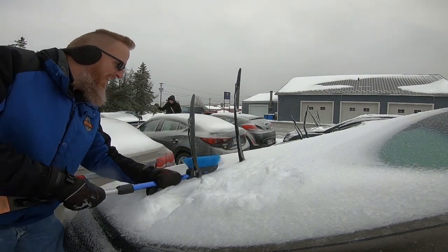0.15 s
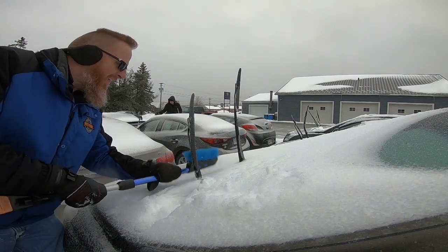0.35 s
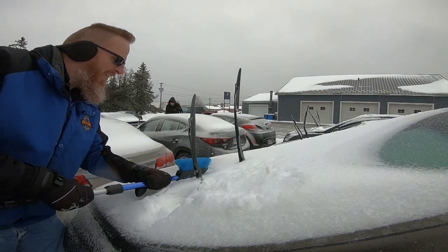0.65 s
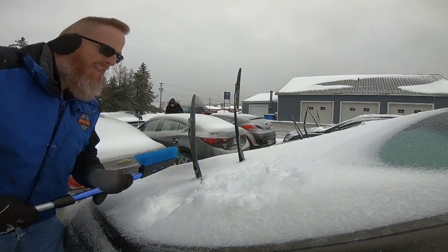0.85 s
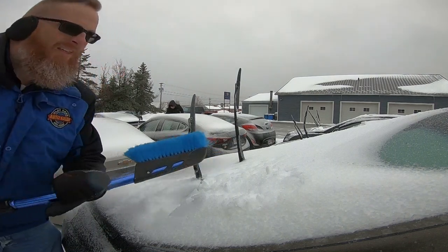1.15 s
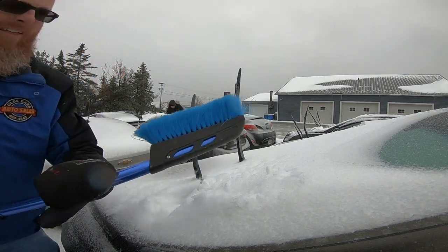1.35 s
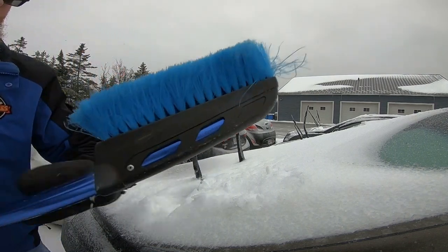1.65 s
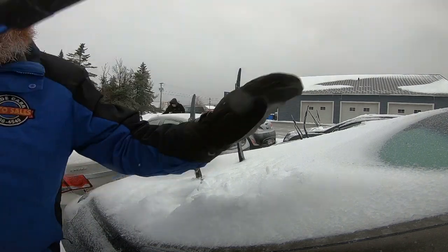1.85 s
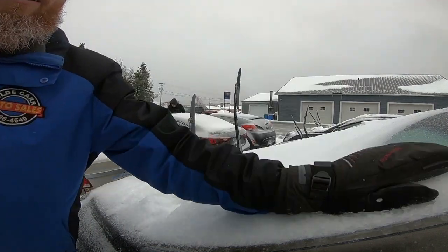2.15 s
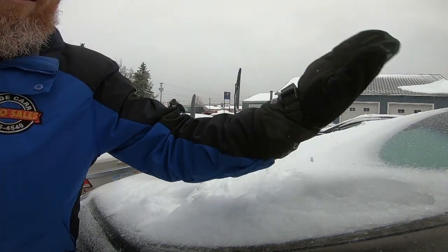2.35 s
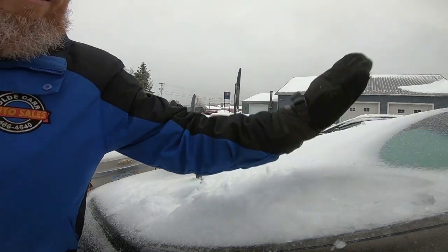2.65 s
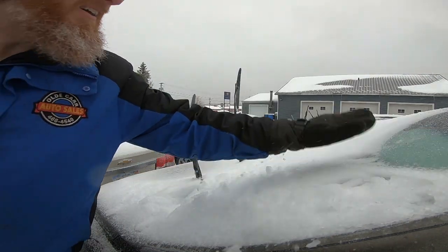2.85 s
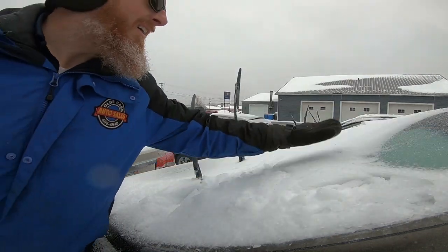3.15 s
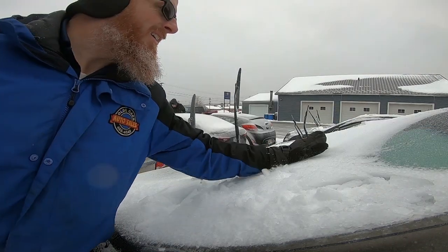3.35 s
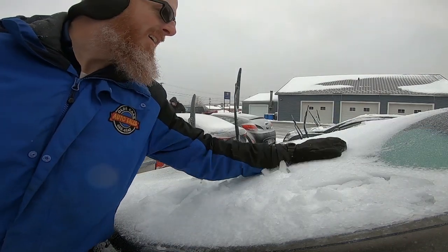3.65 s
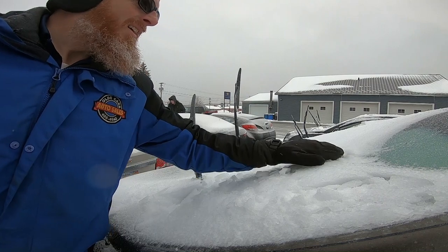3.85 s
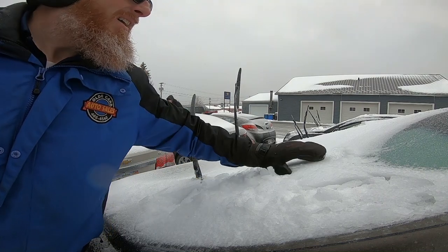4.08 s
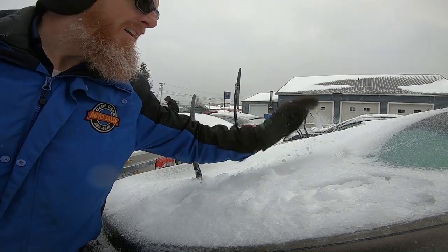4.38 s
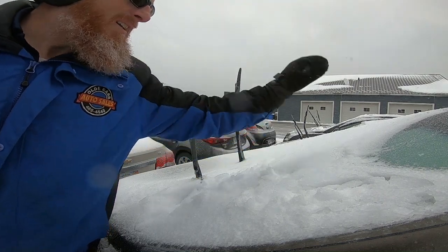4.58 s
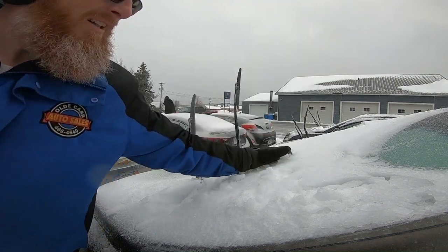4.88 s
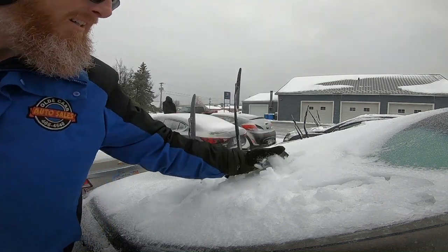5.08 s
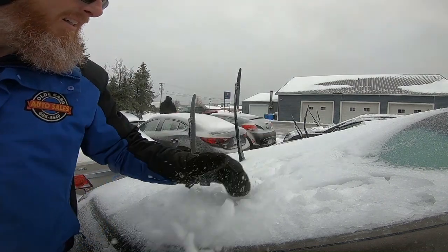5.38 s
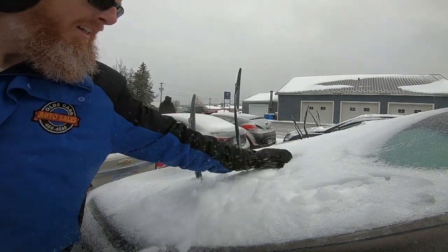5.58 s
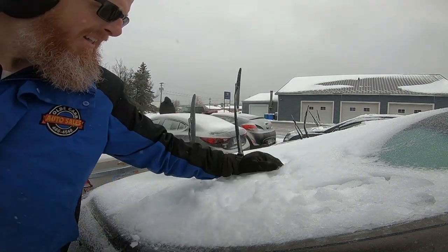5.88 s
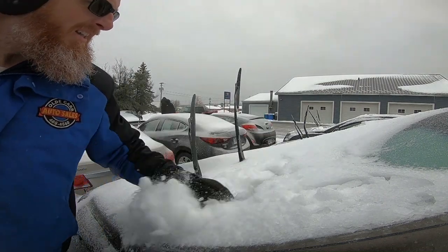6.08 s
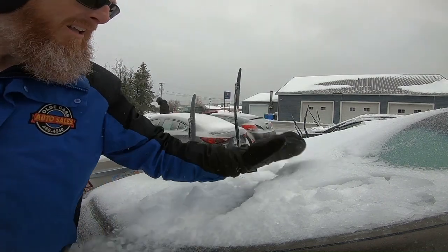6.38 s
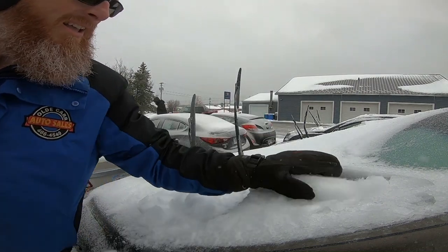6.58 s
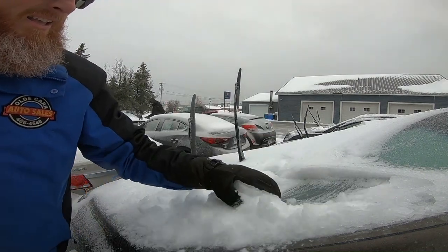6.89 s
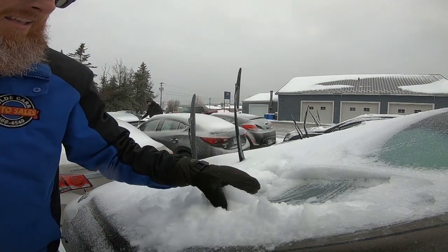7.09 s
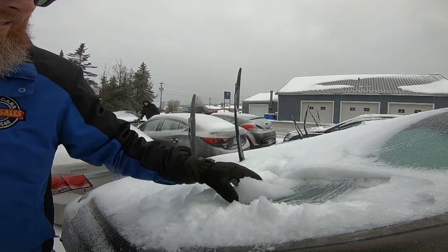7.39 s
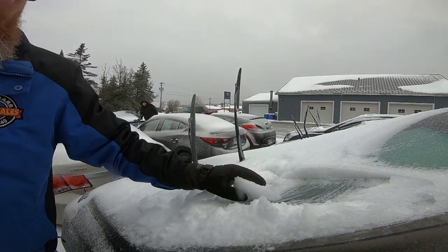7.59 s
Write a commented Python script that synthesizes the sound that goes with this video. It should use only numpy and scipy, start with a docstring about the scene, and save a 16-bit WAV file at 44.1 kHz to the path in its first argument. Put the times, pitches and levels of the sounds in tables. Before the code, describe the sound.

Outdoors, low wind buffets the microphone throughout, over a faint hush of open air. In the first 0.6 seconds a plastic scraper jabs a frozen car windshield four times with short, sharp chips. A jacket rustles softly, and a gust swells just before 2 seconds. From about 2.1 to 3.6 seconds a gloved hand slaps the snowy glass six times, evenly, about three a second. These are the loudest sounds, each a crunchy crack with a low boom from the pane, with brief gritty rubs between them. Around 4 seconds a sleeve swishes, followed by a small crack of crust. From about 4.8 seconds the glove ploughs snow off in uneven crunching sweeps, light and hissy at first, firmest between 5.8 and 6.8 seconds. Ice crumbs tick and bits of crust snap, and the sliding turns softer until the end, at about 7.7 seconds.

```python
"""Four jabs of a plastic scraper chip a frozen, snow-covered windshield, as wind buffets the microphone.
A gloved hand then slaps it six times: brittle fracture of the crust gives a broadband crack, and the
impact excites the low modes of the glass, which booms. The hand ploughs the snow off in crunching
sweeps, each the sum of many tiny crystal fractures. Friction makes a jacket rustle; ice crumbs tick."""
import sys
import numpy as np
from scipy import signal
from scipy.fft import rfft, irfft, next_fast_len
from scipy.io import wavfile
from scipy.ndimage import uniform_filter1d, map_coordinates

SR = 44100
rng = np.random.default_rng(int(sys.argv[2]) if len(sys.argv) > 2 else 0)


def output_pcm(signal):
    """Save a mono or channel-first signal as 16-bit PCM at the path in sys.argv[1].

    Samples are clipped to [-1, 1] before scaling.
    """
    pcm = np.clip(np.atleast_2d(signal).T, -1, 1) * 32767
    wavfile.write(sys.argv[1], SR, np.round(pcm).astype(np.int16))


N = 340893
TIME = np.arange(N) / SR
AGE = np.arange(SR * 3 // 4) / SR  # time since an impact [s]


def amp(db):
    """Amplitude ratio: tenfold for every 20 dB."""
    return 10 ** (np.asarray(db) / 20)


def unit(x):
    """Normalisation to rms 1."""
    return x / np.sqrt(np.mean(x ** 2) + 1e-20)


def curve(rows):
    """Linear interpolation of (time, value) points at every sample."""
    return np.interp(TIME, *np.transpose(rows))


def wobble(rate):
    """Random modulation: a spline through rate Gaussian knots a second."""
    return map_coordinates(rng.standard_normal(int(N * rate / SR) + 4), [TIME * rate])


def colour(x, spectrum, lo=1, hi=SR):
    """Spectral shaping by (frequency [Hz], level [dB]) points, band-passed from lo to hi, at rms 1."""
    size = next_fast_len(len(x) + 8192)
    hz = np.fft.rfftfreq(size, 1 / SR) + 1e-3
    knots_hz, knots_db = np.transpose(spectrum)
    gain = amp(np.interp(np.log(hz), np.log(knots_hz), knots_db))
    band = 1 / np.sqrt((1 + (lo / hz) ** 10) * (1 + (hz / hi) ** 10))
    return unit(irfft(rfft(x, size) * band * gain, size)[:len(x)])


def noise(spectrum, lo=1, hi=SR, size=N):
    """Filtered Gaussian noise of rms 1."""
    return colour(rng.standard_normal(size), spectrum, lo, hi)


def fade(t60, hold=0):
    """Exponential decay of 60 dB every t60, after hold seconds at full strength."""
    return np.exp(-np.log(1000) * np.maximum(AGE - hold, 0) / t60)


def mode(hz, t60):
    """Free vibration of a damped oscillator: a decaying sine."""
    return np.sin(2 * np.pi * hz * AGE) * fade(t60)


def add(track, s, sound):
    """Superposition of a sound on the track at s seconds."""
    start = round(s * SR)
    track[start:start + len(sound)] += sound[:N - start]


def strokes(rows, attack, release):
    """Incoherent strokes swell, hold, decay and add in power; one gain curve per level column."""
    power = np.zeros((len(rows[0]) - 2, N))
    for s, length, db, *relative_db in rows:
        swell = np.clip((TIME - s) / attack, 0, 1)
        decay = np.exp(-np.clip((TIME - s - length) / release, 0, 20))
        power += np.outer(amp(db + np.array([0, *relative_db])), swell * decay) ** 2
    return np.sqrt(power)


def grains(rate, spread_db, smooth):
    """Shot noise: rate log-normal impulses a second at equal mean power, over smooth rubbing noise."""
    sizes = amp(spread_db * np.clip(rng.standard_normal(N), -2, 2)) / np.sqrt(rate)
    cracks = (rng.random(N) < rate / SR) * rng.choice([-1, 1], N) * sizes
    return unit(cracks) + smooth * rng.standard_normal(N)


def clump_resonances(x, depth_db):
    """Each clump of grains has passing resonances: a random gain over time and frequency."""
    spectra = signal.stft(x, nperseg=512)[2]
    field = rng.standard_normal(spectra.shape)
    for axis in (0, 1):
        field = uniform_filter1d(field, size=4, axis=axis)
    return signal.istft(spectra * amp(depth_db * unit(field)), nperseg=512)[1][:N]


def snap(hz, t60, size=2048):
    """Brittle fracture of one lump: a very short noise burst peaking at hz."""
    spectrum = [(hz / 10, -17), (hz / 3, -6), (hz, 0), (hz * 1.44, -6), (hz * 5, -20), (hz * 14, -38)]
    return fade(t60)[:size] * noise(spectrum, hi=11000, size=size)


def fracture(spectrum, levels, contact, rise, t60, tail_db, tail_t60, damping):
    """Crust shatters during contact; the panel rattles on, and damping takes its treble first."""
    edges_hz = [220, 700, 2000, 6000, 16000]  # four bands: knock, clack, crack, spray
    out = 0
    for db, lo, hi in zip(levels, edges_hz, edges_hz[1:]):
        life = (2000 / hi) ** damping
        envelope = fade(t60 * life, hold=contact) + amp(tail_db) * fade(tail_t60 * life)
        out = out + amp(db) * envelope * noise(spectrum, lo, hi, size=len(AGE))
    return out * (1 - np.exp(-AGE / rise))


# ambient spectrum: (frequency [Hz], relative density [dB])
AIR_SPECTRUM = [(100, 3), (300, -10.5), (1000, -18), (4400, -29.5), (6500, -36), (10500, -41.5),
                (15800, -32)]
def hush():
    """Stationary ambient noise: the faint hush of the open air."""
    return amp(-50.5) * noise(AIR_SPECTRUM)


# wind strength: (time [s], level [dB])
WIND_LEVELS = [(0.0, -15), (1.55, -19.5), (2.3, -15), (4.05, -21), (5.3, -16), (6.1, -21.5), (6.5, -30),
               (7.0, -17.5), (7.55, -18), (7.7, -9.5)]
# gusts: (peak time [s], rise [dB], half width [s])
WIND_GUSTS = [(.01, -1, 0.026), (1.867, 10, 0.066), (4.332, 4.5, .07), (5.455, 10, 0.017)]
# spectra of slow eddies and of flutter: (frequency [Hz], relative density [dB])
EDDY_SPECTRUM = [(2, -12), (7, 7), (14, -4), (28, -6.5), (50, -30.5), (200, -100)]
FLUTTER_SPECTRUM = [(15, 5.5), (32, -40), (50, -7), (75, -13.5), (300, -49.5), (900, -76)]
def wind():
    """Turbulent pressure on the microphone: one wind strength drives eddies and wider-swinging flutter."""
    strength_db = curve(WIND_LEVELS)
    mean_db = strength_db.mean()
    gusts_db = sum(db * np.exp(-((TIME - s) / half) ** 2) for s, db, half in WIND_GUSTS)
    swing_db = strength_db - mean_db + gusts_db
    eddies = amp(swing_db - 1 + 2 * wobble(7.3)) * noise(EDDY_SPECTRUM)
    flutter = amp(1.3 * swing_db - 13.5 + 4.5 * wobble(18)) * noise(FLUTTER_SPECTRUM)
    ceiling = 0.7
    return ceiling * np.tanh(amp(mean_db) * (eddies + flutter) / ceiling)


# rubbed cloth: (frequency [Hz], relative density [dB])
CLOTH_SPECTRUM = [(150, -32.5), (250, 2.5), (903, 0), (1320, 1), (2790, -8.5), (3150, -6.5), (6300, -13),
                  (11000, -15), (15800, -29.5)]
def rubbing(texture, rub, hiss):
    """Friction noise of cloth: one texture excites a dull rub and a dry hiss."""
    low_band = colour(texture, CLOTH_SPECTRUM, lo=297, hi=4500)
    high_band = colour(texture, CLOTH_SPECTRUM, lo=2410)
    return rub * low_band + hiss * high_band


# arm swings: (start [s], duration [s], rub level [dB], hiss re rub [dB])
SLEEVE_SWISHES = [(0.0, 0.25, -53, -2), (.42, .22, -57, 2), (.94, .15, -63, 3), (1.3, 0.22, -57.5, -9),
                  (1.475, 0.056, -52, 2), (1.655, 0.023, -39, -16.5), (1.73, 0.07, -50.5, -24),
                  (3.8, .11, -46.5, 1.5), (3.92, 0.17, -41.5, -6), (4.1, 0.14, -48.5, -11),
                  (4.38, 0.16, -55.5, -7)]
def jacket():
    """Sliding friction: the sleeve swishes as the arm swings and never quite rests."""
    swishes = strokes(SLEEVE_SWISHES, attack=0.022, release=0.028)
    rub, hiss = np.hypot(swishes, amp(-61 + wobble(6.08)))
    cloth = grains(rate=5000, spread_db=5.5, smooth=0.65) * amp(2.3 * wobble(45) + 0.62 * wobble(220))
    return rubbing(cloth, rub, hiss)


def crumbs(hiss):
    """Random impacts: from the first slap on, loose crumbs tick and ring, louder with harder rubbing."""
    per_s, low_hz, high_hz, spread_db = 50, 1600, 11000, 15
    out = np.zeros(N)
    start = GLOVE_SLAPS[0][0]
    span = TIME[-1] - start
    strength = np.minimum(hiss * amp(4.5), amp(-38))
    for when, force, pitch in rng.random((int(per_s * span), 3)):
        s = start + when * span
        octaves = pitch * np.log2(high_hz / low_hz)
        hz = low_hz * 2 ** octaves
        tick = snap(hz, t60=0.017)
        tick += amp(-3) * mode(hz, t60=0.016)[:len(tick)]
        db = spread_db * force ** 2 - 3 * octaves  # small, high crumbs are fainter
        add(out, s, strength[int(s * SR)] * amp(db) * tick)
    return out


# glove rubs between slaps: (start [s], duration [s], rub level [dB], hiss re rub [dB])
ICE_RUBS = [(2.23, 0.13, -53, -7.5), (2.44, 0.25, -50.5, 3.5), (2.52, 0.05, -55.5, 0),
            (2.73, 0.33, -52.5, 7), (3.01, 0.17, -40.5, -7.5), (3.22, 0.24, -54, 2), (3.51, .07, -50, -1),
            (3.615, .12, -43, -1), (3.73, 0.098, -56, 6.5)]
def grating(rub, hiss):
    """Friction on a rough surface: the glove grates over sparse, coarse grains of ice."""
    ice = grains(rate=600, spread_db=2, smooth=0.4) * amp(2 * wobble(45) + 4.1 * wobble(220))
    return rubbing(clump_resonances(ice, depth_db=3), rub, hiss)


# crushed snow and crust: (frequency [Hz], relative density [dB])
SNOW_SPECTRUM = [(88, 1), (150, -1.5), (179, -4.5), (340, -2), (397, -7), (455, -2.5), (622, -4),
                 (993, -2.5), (1160, -1), (1470, -2.5), (3520, -3.5), (4200, -0.5), (5960, -11),
                 (10900, -15.5), (15800, -28.5)]
# slips on the handle or crust: (peak time [s], level [dB], half width [s], tilt [dB/octave])
GLOVE_SKIDS = [(1.137, -36, 0.0034, 2), (2.575, -47, 0.029, -9), (2.971, -29, 0.0089, -2.5),
               (2.214, -29, 0.02, -3.5), (2.41, -31.5, 0.0031, 0), (2.877, -28.5, 0.015, 2),
               (3.453, -35.5, 0.0062, -0.5), (3.693, -27, 0.032, 0.5), (4.351, -24, 0.0038, -1)]
def skids():
    """Frictional slip: the glove grinds icy grains in a short swell."""
    out = np.zeros(N)
    grit = grains(rate=2500, spread_db=6.5, smooth=0.37) * amp(1.8 * wobble(250))
    grit = clump_resonances(grit, depth_db=3)
    for s, db, half, tilt in GLOVE_SKIDS:
        spectrum = [(hz, level + tilt * np.log2(hz)) for hz, level in SNOW_SPECTRUM]
        out += amp(db) * np.exp(-((TIME - s) / half) ** 2) * colour(grit, spectrum, lo=75)
    return out


# light sliding in snow: (time [s], crunch level [dB])
SNOW_SLIDE = [(4.76, -42.5), (5.3, -45), (5.4, -47), (5.58, -42.5), (6.5, -36.5), (6.97, -46.5),
              (7.27, -47), (7.6, -52)]
# firm pushes: (start [s], duration [s], crunch level [dB], drag re crunch [dB], hiss re crunch [dB])
SNOW_PUSHES = [(4.855, 0.087, -45.5, 5.5, 9), (5.01, 0.2, -33.5, 0, -1), (5.2, 0.13, -32.5, -8, 0),
               (5.51, 0.027, -40.5, 9, -2), (5.785, 0.12, -36.5, 2.5, -7.5), (5.92, 0.055, -26.5, -6, -1.5),
               (5.985, 0.042, -27, -2, 0), (6.04, 0.11, -34.5, -2.5, -4.5), (6.25, 0.093, -34.5, 0.5, -9),
               (6.345, 0.071, -31.5, 2.5, -6), (6.552, 0.16, -27.5, -12.5, -6), (6.72, 0.14, -36, -11, -2),
               (7.125, 0.18, -47.5, 5.5, 6), (7.39, 0.089, -48, 9, -60), (7.655, 0.057, -39.5, -6.5, -18)]
def sweep_gains():
    """Power addition of sliding and pushing gives the glove's gains of crunch, drag and hiss."""
    landing_s = 4.757
    sliding = amp(curve(SNOW_SLIDE)) * np.clip((TIME - landing_s) / 0.0027, 0, 1)
    light = np.outer(amp([0, -3, 1.5]), sliding)  # light sliding favours hiss
    return np.hypot(light, strokes(SNOW_PUSHES, attack=0.018, release=0.013))


def snow_sweeps(crunch, drag, hiss):
    """Granular compaction: the firmer the push, the more crystals break, in uneven clumps."""
    skimming = TIME < 5.35  # the first stroke only skims soft powder
    firm_per_s, firm_db = 8000, -32
    fewest_per_s = np.where(skimming, 4000, 1400)
    rate = np.clip(firm_per_s * (crunch / amp(firm_db)) ** 2, fewest_per_s, 12000)
    clumps_db = np.where(skimming, 0.84, 1.67) * (0.79 * wobble(70) + 1.97 * wobble(260))
    clumps = amp(np.minimum(clumps_db, 3))  # a clump gives way before it gets any louder
    smooth = np.where(skimming, 0.9, 0.6)
    crystals = grains(rate, spread_db=4, smooth=smooth) / np.hypot(1, smooth)
    packed = clump_resonances(crystals * clumps, depth_db=2.4)
    return (drag * colour(packed, SNOW_SPECTRUM, lo=120, hi=666)
            + crunch * colour(packed * amp(1.04 * wobble(120)), SNOW_SPECTRUM, lo=670, hi=2590)
            + hiss * colour(packed, SNOW_SPECTRUM, lo=3000))


# windshield modes: (frequency [Hz], relative level [dB], T60 [s])
GLASS_MODES = [(53.1, -21.5, 0.91), (88.8, -10.5, 0.51), (124.3, -14.5, 0.64), (148.5, -1.5, 0.095),
               (177.3, 3, 0.072), (210.6, -11, 0.19), (337.5, -6, 0.061)]
def glass(thud_db, boom_db):
    """Plate vibration: the pane booms at fixed low modes; its higher thud shifts with the spot struck."""
    out = 0
    for hz, db, t60 in GLASS_MODES:
        if hz < 140:
            db += boom_db
        else:
            db += thud_db
            hz *= 1 + 0.04 * rng.normal()
        out = out + amp(db + rng.normal()) * mode(hz, t60)
    return out


# slabs: (time [s], relative crack level [dB], then re crack: knock [dB], clack [dB], spray [dB],
# split [dB])
CRUST_SLABS = [(4.3545, -13.5, -8.5, -16, -6.5, -17), (5.5144, -13, -5, -11, -12, -8),
               (6.2517, -11, -8, 0.5, -21, 3)]
# lumps: (time [s], relative level [dB], frequency [Hz])
CRUST_LUMPS = [(0.8915, -29, 1110), (2.327, -30.5, 2200), (2.463, -20, 3580), (2.545, -20, 1790),
               (2.569, -18, 1610), (2.66, -26.5, 4000), (2.614, -15, 2000), (3.044, -16.5, 1150),
               (3.14, -18, 5100), (3.167, -16, 4580), (4.043, -16, 2930), (4.1986, -23.5, 2570),
               (4.7623, -17, 3930), (5.288, -5.5, 4030), (5.418, -23, 2460), (5.4315, -18.5, 2910),
               (5.4543, -14, 1530), (5.485, -16, 3400), (5.5684, -17.5, 3680), (5.7165, -12, 1400),
               (5.8419, -6, 1200), (6.2639, -12.5, 1070), (6.2918, -13.5, 1870), (6.5614, -10.5, 1560),
               (7.126, -17, 1740), (7.2812, -16.5, 1190), (7.3552, -19, 1210), (7.4643, -21.5, 1110)]
def breaking_crust():
    """Brittle fracture: slabs split and crunch with a faint thud; small lumps click, burst and ring."""
    out = np.zeros(N)
    for s, db, knock_db, clack_db, spray_db, split_db in CRUST_SLABS:
        crunch = fracture(SNOW_SPECTRUM, [knock_db, clack_db, 0, spray_db], contact=0.0018,
                          rise=0.00028, t60=0.05, tail_db=3, tail_t60=0.048, damping=0.26)
        add(out, s, amp(db - 12.5) * (crunch + glass(thud_db=-21.5, boom_db=-6.5)))
        add(out, s, amp(db + split_db) * snap(hz=2500, t60=0.0012))
    for s, db, hz in CRUST_LUMPS:
        burst = snap(hz, t60=0.015)
        click = amp(5) * snap(hz, t60=0.0025)
        squeak = amp(-2) * mode(hz, t60=0.033)
        for part in (burst, click, squeak):
            add(out, s, amp(db - 8) * part)
    return out


# blade modes: (frequency [Hz], relative level [dB], T60 [s])
BLADE_MODES = [(1860, 0.5, 0.051), (2320, 14.5, 0.046), (4130, 12, 0.051), (5600, -13, .06),
               (7360, -24, .06)]
# chipped ice: (frequency [Hz], relative density [dB])
JAB_SPECTRUM = [(150, -23), (250, -3.5), (781, -6), (2090, -7.5), (2850, -12.5), (4870, -5), (8040, -20.5),
                (11200, -21.5), (15500, -41.5)]
# jabs: (time [s], relative crack level [dB], then re crack: thud [dB], knock [dB], clack [dB],
# spray [dB]; blade ring gain [dB])
SCRAPER_JABS = [(0.1593, -8, -15.5, -0.5, -6, -5.5, -41), (0.3040, -13, -25, -14.5, -6, -6, -40),
                (0.3739, -6, -7.5, -2, -5, -1.5, -41), (0.5652, -15, -7, 4, 2.5, 4, -37)]
def scraper():
    """Hard impact: the blade chips the ice, excites its own modes and the pane's, and rebounds once."""
    rebound_s, rebound_db = 0.028, -19
    out = np.zeros(N)
    for s, db, thud_db, knock_db, clack_db, spray_db, ring_db in SCRAPER_JABS:
        chip = fracture(JAB_SPECTRUM, [knock_db, clack_db, 0, spray_db], contact=0.0028,
                        rise=0.0003, t60=0.009, tail_db=-7.5, tail_t60=0.16, damping=0.2)
        blade = sum(amp(level + 6.5 * rng.normal()) * mode(hz, t60) for hz, level, t60 in BLADE_MODES)
        pane = glass(thud_db + 4.5, boom_db=thud_db + 16)
        add(out, s, amp(db - 9.5) * (chip + pane) + amp(ring_db) * blade)
        add(out, s + rebound_s, amp(db + rebound_db) * snap(hz=6000, t60=0.011))
    return out


# slapped crust: (frequency [Hz], relative density [dB])
SLAP_SPECTRUM = [(150, -15), (250, -5), (405, -1.5), (692, -12.5), (1140, -8.5), (1590, -14.5), (2200, -14),
                 (3060, -21.5), (3510, -17.5), (7250, -29), (10400, -25.5), (15500, -42.5)]
# slaps, the first with a soft rebound: (time [s], relative crack level [dB], then re crack: thud [dB],
# knock [dB], clack [dB], spray [dB]; contact time [s], boom re thud [dB])
GLOVE_SLAPS = [(2.108, -3.5, -16, 3.5, 2, -8, 0.01, 7.5), (2.196, -39.5, 1, 17.5, -2, 2, 0.015, -15),
               (2.4291, -4.5, -11.5, -2, 3, -8.5, 0.0079, -5.5),
               (2.7044, -10.5, -8.5, 9, 6, -12, 0.0093, -9.5), (2.9982, -5, -2, 7, -3.5, -14, 0.0059, -5.5),
               (3.3047, -2, -9, 3, 3.5, -14.5, 0.003, -3), (3.6101, -5, -6, 6.5, 6, -11, 0.0034, 2.5)]
def slaps():
    """Cushioned impact: the padded palm crushes the crust, then drives the modes of the whole pane."""
    out = np.zeros(N)
    for s, db, thud_db, knock_db, clack_db, spray_db, contact, boom_db in GLOVE_SLAPS:
        crush = fracture(SLAP_SPECTRUM, [knock_db, clack_db, 0, spray_db], contact,
                         rise=0.00075, t60=0.018, tail_db=-15.5, tail_t60=0.18, damping=0.34)
        add(out, s, amp(db - 8.5) * crush)
        add(out, s + 0.00158, amp(db + 6.5) * glass(thud_db, thud_db + boom_db))
    return out


def scene():
    """Free-field superposition: every source reaches one microphone directly."""
    crunch, drag, snow_hiss = sweep_gains()
    rub, ice_hiss = strokes(ICE_RUBS, attack=0.004, release=0.013)
    blows = scraper() + slaps() + breaking_crust()
    friction = skids() + snow_sweeps(crunch, drag, snow_hiss) + grating(rub, ice_hiss) + jacket()
    return (blows + friction + wind() + hush() + crumbs(snow_hiss + ice_hiss))[None]


def record(dry):
    """Saturation rounds off the hardest slaps; a band limit then removes the highest treble."""
    ceiling, top_hz = 0.95, 16000
    clipped = dry / (1 + np.abs(dry / ceiling) ** 5) ** (1 / 5)
    size = next_fast_len(N + SR // 2)
    passband = np.fft.rfftfreq(size, 1 / SR) < top_hz
    return irfft(rfft(clipped, size) * passband, size)[..., :N]


dry = scene()
out = record(dry)
output_pcm(out)
```